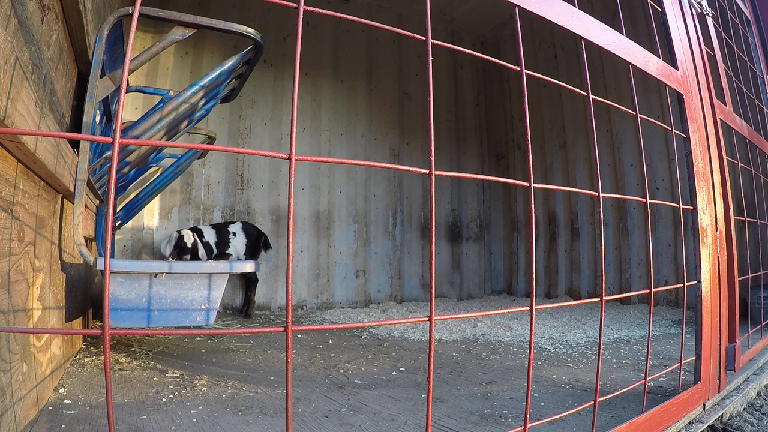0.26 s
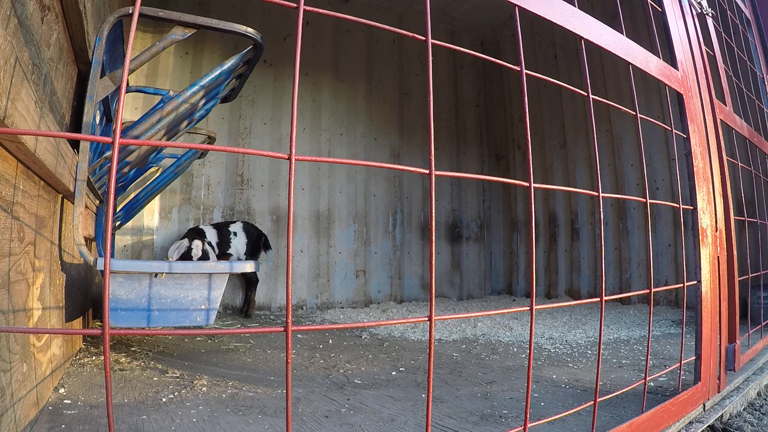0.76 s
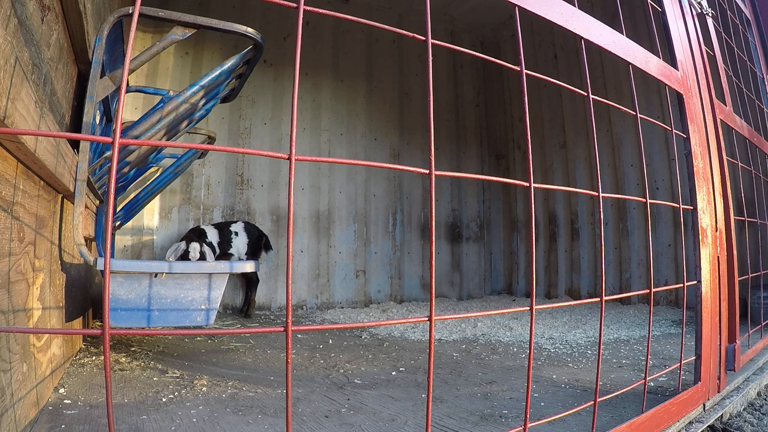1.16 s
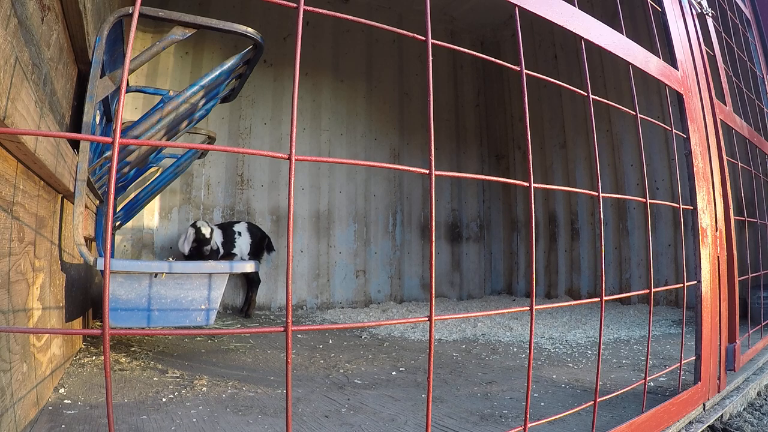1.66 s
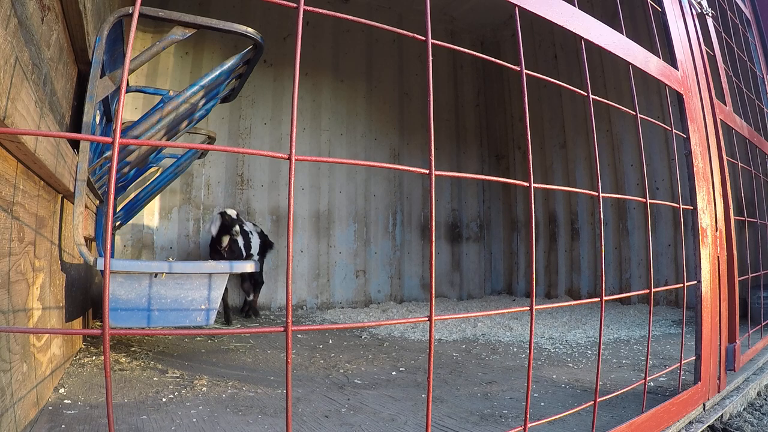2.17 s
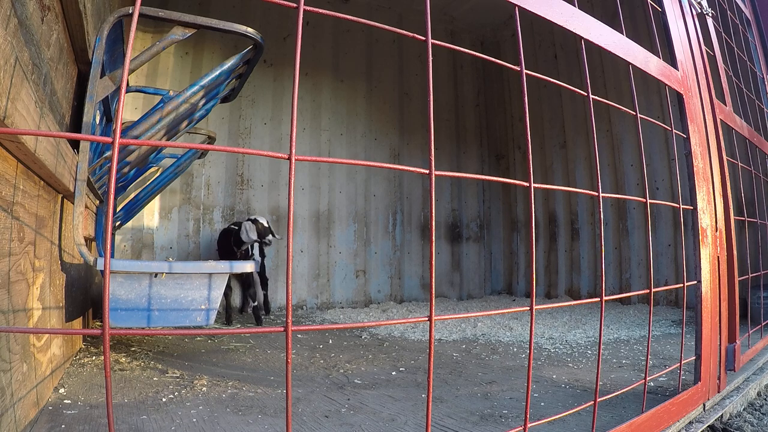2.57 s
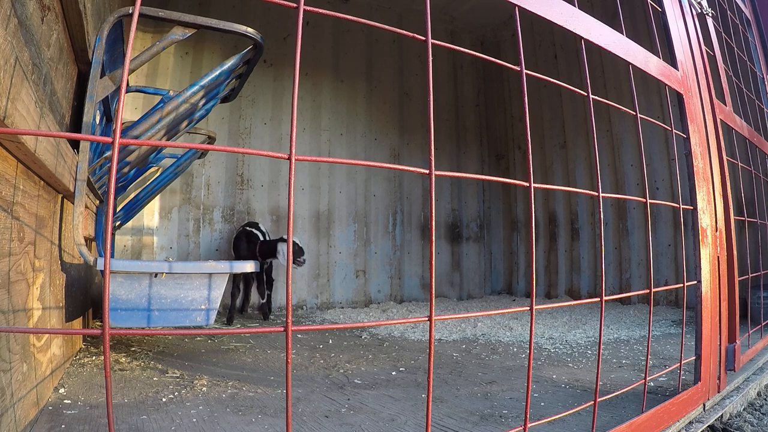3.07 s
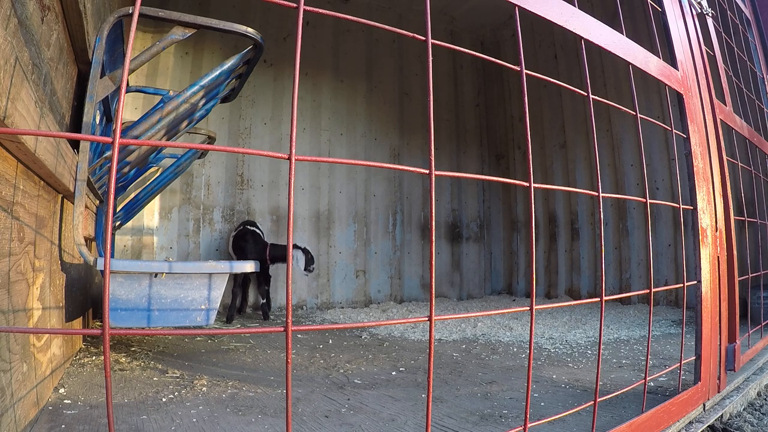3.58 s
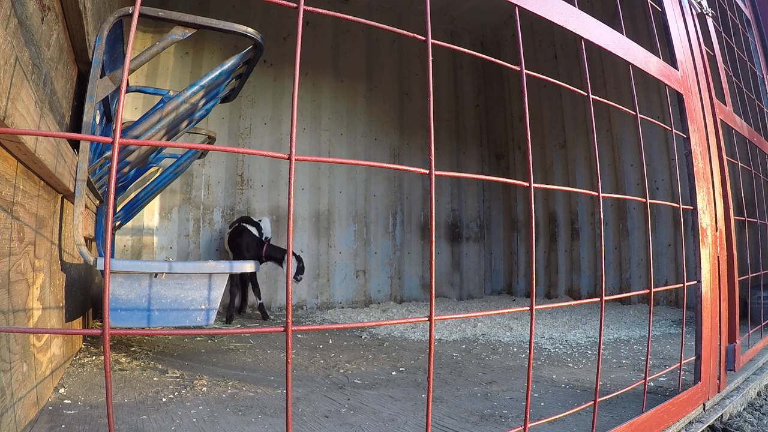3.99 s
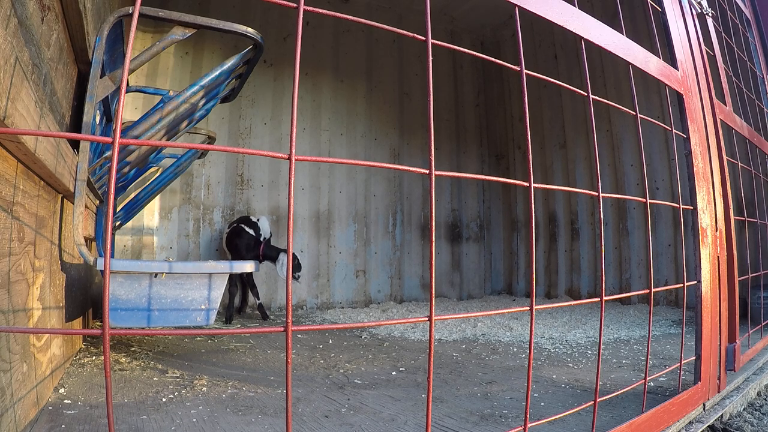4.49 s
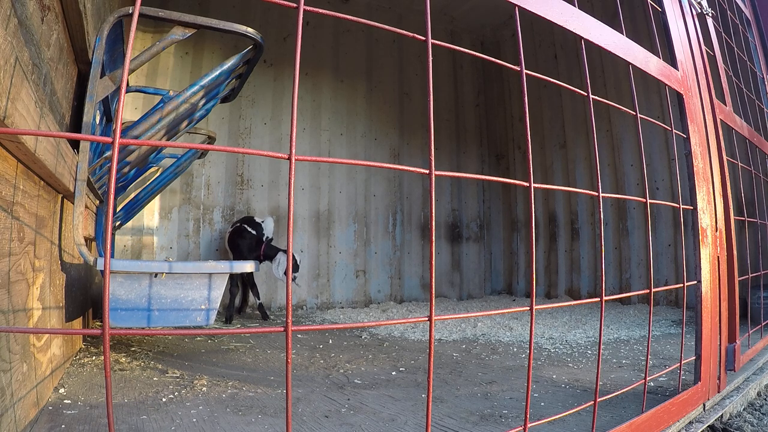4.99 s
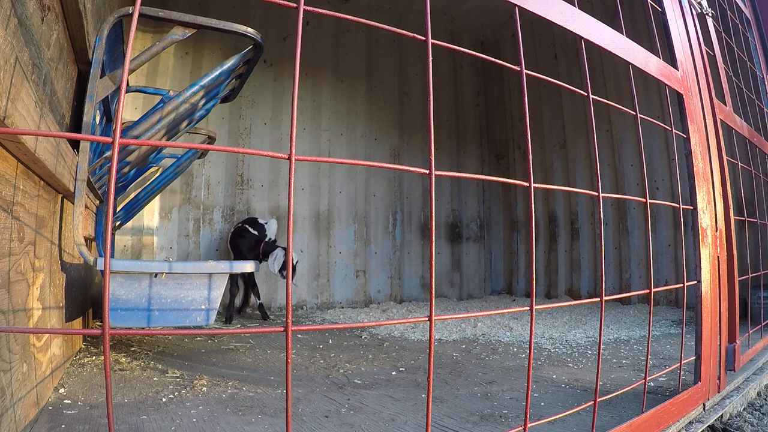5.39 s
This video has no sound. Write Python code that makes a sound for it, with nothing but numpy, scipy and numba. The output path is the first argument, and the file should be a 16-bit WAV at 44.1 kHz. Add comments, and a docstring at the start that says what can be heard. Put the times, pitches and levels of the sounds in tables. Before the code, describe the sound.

A quiet outdoor bed runs throughout: soft hiss, thin high insect sizzle and a wavering low rumble. At about 0.45 s a faint bird peep drops onto its note and fades, joined from 0.5 to 1.35 s by a distant harsh falling call and, near 0.9 s, a very faint arched whistle. From 1.83 s a plastic tub drags low over the floor; at 2.13 s a hoof knocks it with a hollow clack and a deep, shuddering boom, with lighter taps until 2.3 s. A young goat bleats once from 2.47 to 3.35 s: a small closed-mouth start, then bursting loud near 2.7 s, high, nasal and quavering, sinking hoarsely. Metal walls echo it strongly but briefly. Small hoof taps follow around 3.4, 4.1 and 4.8 s. From 4.25 s to the end faint scratchy chirps repeat about five times a second, with another far harsh call and weak whistles.

```python
"""Goat kid in a metal pen

A goat kid bleats once in a sheet-metal pen: throat-weighted vocal-fold overtones plus gated breath noise.
Walls (cross-fed delay lines) return the voice strongly, so each overtone beats with its own echoes.
Hooves knock a plastic tub and the floor (noise bursts, decaying modes); the tub is pushed along (low noise).
Outside: faint birds (swept tones, noise chirps), hissing insects (noise bands), a wavering low rumble."""
import sys
import numpy as np
from scipy import signal
from scipy.fft import rfft, irfft
from scipy.io import wavfile
from scipy.ndimage import uniform_filter1d
from numba import njit

SR = 44100
rng = np.random.default_rng(int(sys.argv[2]) if len(sys.argv) > 2 else 0)


def transcribe(signal):
    """Save signal, clipped to [-1, 1], as a 16-bit WAV file at the path in sys.argv[1]."""
    frames = np.atleast_2d(signal).T
    limited = np.clip(frames, -1, 1)
    pcm = np.round(limited * 32767).astype(np.int16)
    wavfile.write(sys.argv[1], SR, pcm)


N = 249165
T = np.arange(N) / SR


def undb(db):
    """dB to gain."""
    return 10 ** (np.asarray(db) / 20)


def columns(table):
    """Interpolate each column linearly over time; last item gates the table's time span."""
    s, *rest = np.transpose(table)
    return [np.interp(T, s, c) for c in rest] + [(T > s[0]) & (T < s[-1])]


def unit(x):
    """Scale to rms 1."""
    return x / np.sqrt(np.mean(x ** 2))


def band(lo_hz, hi_hz):
    """Noise between two edges, rms 1."""
    sos = signal.butter(2, [lo_hz, hi_hz], "bandpass", fs=SR, output="sos")
    return unit(signal.sosfilt(sos, rng.standard_normal(N)))


def walk(rate_hz):
    """Smoothed random steps, rms 1."""
    k = int(SR / rate_hz)
    steps = np.repeat(rng.standard_normal(N // k + 1), k)
    return unit(uniform_filter1d(uniform_filter1d(steps, k), k)[:N])


def since(start_s, length_s, attack_s=0.014, release_s=.04):
    """Share of an event gone by, and its gate with linear edges."""
    gate = np.clip(np.minimum((T - start_s) / attack_s, (start_s + length_s - T) / release_s), 0, 1)
    return np.clip((T - start_s) / length_s, 0, 1), gate


def tone(hz):
    """Sine that follows a pitch track."""
    return np.sin(2 * np.pi * np.cumsum(hz) / SR)


def peak(hz, centre_hz, width_hz):
    """Gain of a steep resonance: 1 at its centre, a quarter at half its width off."""
    return 1 / (1 + (2 * (hz - centre_hz) / width_hz) ** 2) ** 2


def ring(modes):
    """Impulse response of a struck body: a sum of exponentially decaying sine modes."""
    t = T[:SR // 2]
    return sum(undb(db) * np.sin(2 * np.pi * hz * t) * 1000. ** (-t / t60) for hz, db, t60 in modes)


def goat():
    """Vocal-fold overtones weighted by throat resonances, with breath gated once a cycle."""
    # fold pitch: time_s, pitch_hz
    pitch_track = [(2.47, 315), (2.48, 315.3), (2.55, 507.4), (2.606, 509.7), (2.69, 556), (2.72, 545.7),
                   (2.75, 516.5), (2.782, 537.4), (2.882, 569.8), (2.94, 565.5), (3.03, 550.2),
                   (3.075, 553.3), (3.2, 507.6), (3.255, 488), (3.32, 418), (3.345, 405)]
    # octave, in the first throat resonance, quavering: time_s, level_db
    octave_track = [(2.47, -55), (2.486, -34), (2.534, -40), (2.596, -41), (2.654, -25.5), (2.708, -11),
                    (2.75, -18.5), (2.812, -17.5), (2.844, -11), (2.894, -21), (2.98, -11.5), (3.04, -18),
                    (3.17, -18.5), (3.212, -29.5), (3.3, -30.5), (3.345, -35)]
    # mouth opening and closing: time_s, low_resonance_db, upper_resonance_hz, upper_resonance_db, treble_db
    mouth_track = [(2.47, -62, 3100, -62, -68), (2.53, -51.5, 3200, -48, -60),
                   (2.596, -53.5, 3040, -30.5, -55), (2.654, -38, 3200, -37, -45),
                   (2.715, -29, 3250, -24, -31.5), (2.812, -28, 3270, -23, -35.5),
                   (2.88, -41.5, 3343, -27, -35.5), (2.994, -37, 3760, -24, -37),
                   (3.064, -45, 3800, -24, -39), (3.19, -28.5, 3400, -26.5, -39),
                   (3.27, -28, 3536, -39, -50), (3.345, -53, 3600, -55, -65)]
    # resonances between low and top: centre_hz, width_hz, level_db (re treble)
    high_middle = [(2302, 150, 7.5), (2080, 340, -0.5), (2689, 350, 2)]
    # fixed top resonances of the mouth: centre_hz, width_hz, level_db (re treble)
    mouth_top = [(5500, 1500, -3), (6600, 1200, -8), (7500, 800, -17), (9500, 2500, -41),
                 (11800, 1800, -31.5)]
    taut_hz, slack_hz = 545, 425  # folds turn hoarse as they slacken
    clear_rough, open_s, onset_share = .03, 2.66, .45  # less hoarse before the mouth opens
    jitter, hoarse_jitter = .0004, .03  # pitch spread as a share: always; added at full roughness
    first_db, first_attack_s, first_sag_db_per_s = -34.5, .04, 9.5  # fundamental
    patchy_db = 2.5  # rms of each overtone's own waxing and waning
    half_line_db = -22  # strong and weak pulses alternate a little
    haze_db = -34  # constant air leak past the folds, re octave
    upper_width_hz, release_s = 1220, .025

    hz, on = columns(pitch_track)
    hz = uniform_filter1d(hz, size=800)[on]  # folds change tension smoothly
    t, octave_db = T[on], columns(octave_track)[0][on]
    low_db, upper_hz, upper_db, treble_db = (c[on] for c in columns(mouth_track)[:-1])

    slack = np.clip((taut_hz - hz) / (taut_hz - slack_hz), 0, 1)
    rough = np.minimum(clear_rough + slack ** 1.4 * np.where(t < open_s, onset_share, 1), 1)
    sag_db = first_sag_db_per_s * (t - t[0]) + 12 * (t > open_s) * slack ** 1.3
    first = undb(first_db - sag_db) * np.minimum((t - t[0]) / first_attack_s, 1)
    wobble = jitter * walk(60)[on] + hoarse_jitter * rough * walk(300)[on]
    phase = 2 * np.pi * np.cumsum(hz * (1 + wobble)) / SR

    breath = undb(upper_db) * band(3200, 4400)[on] + undb(treble_db) * band(4800, 7200)[on]
    breath += .6 * rough * undb(octave_db) * band(900, 1300)[on]
    voice = 0.86 * rough * breath * (1 + np.cos(phase))
    voice += undb(octave_db + haze_db) * band(1250, 2100)[on]
    voice += first * undb(.6 * patchy_db * walk(9)[on]) * np.sin(phase)
    voice += undb(octave_db) * np.sin(2 * phase)
    for k in np.arange(5, 56) / 2:  # whole and half multiples of the pitch
        f = k * hz
        gain = undb(upper_db) * peak(f, upper_hz, upper_width_hz)
        gain = gain + undb(low_db) * peak(f, centre_hz=1470, width_hz=800)
        treble = sum(undb(db) * peak(f, centre, width) for centre, width, db in high_middle + mouth_top)
        gain = gain + undb(treble_db) * treble
        line_db = half_line_db * (k % 1 > 0) + patchy_db * walk(14)[on]
        voice += gain * undb(line_db) * np.sin(k * phase + k * k)
    out = np.zeros(N)
    out[on] = voice * np.minimum((t[-1] - t) / release_s, 1)
    return out


@njit
def walls(x, lags, gain, damp):
    """Eight delay lines that feed each other, duller on every round."""
    line, soft, out = np.zeros((8, 4096)), np.zeros(8), np.zeros(len(x))
    for i in range(len(x)):
        total = 0.
        for k in range(8):
            soft[k] += (1 - damp) * (gain[k] * line[k, (i - lags[k]) & 4095] - soft[k])
            total += soft[k]
            out[i] += soft[k] * (1 - 2 * (k % 2))
        for k in range(8):
            line[k, i & 4095] = x[i] + soft[k] - total / 4
    return out


def knocks():
    """A hoof gives a short crack and rings the tub; the floor booms a moment later and shakes on."""
    # hoof blows: start_s, click_db, tub_ring_db, floor_boom_db (drive levels)
    blows = [(1.838, -59, -52.5, -40), (2.133, -29.5, -28.5, -10.5), (2.150, -58, -36.5, -50),
             (2.25, -49, -52.5, -50), (2.295, -42, -49, -38), (2.31, -62, -43, -50),
             (2.62, -45.5, -71, -62), (3.39, -70, -51, -45), (3.452, -70, -65, -32), (3.479, -50, -57, -38),
             (4.039, -56, -56, -50), (4.109, -69, -57.5, -53), (4.79, -60, -62.5, -56)]
    # tub modes: pitch_hz, level_db, t60_s
    tub_modes = [(317.2, 2, 0.12), (401, 2, 0.2), (483, 2, 0.07), (599.7, 1, .025), (786, -8.5, 0.02),
                 (1540, -7, 0.02), (2050, -4, 0.013), (2950, -8, 0.015)]
    # floor modes: pitch_hz, level_db, t60_s
    floor_modes = [(34, 0, .2), (62, -14, .2), (115, -11, .15)]
    boom_lag_s, boom_rise_s = .028, 0.0091
    shudder_db, shudder_decay_s = -27.5, .2  # floor keeps shaking after a boom
    drag_s, drag_length_s, drag_db, drag_fade_db = 1.83, 0.27, -35, 11.5  # tub pushed over the floor

    crack, tub_hit, floor_hit = np.zeros((3, N))
    for s, click_db, ring_db, boom_db in blows:
        crack[int(s * SR)], tub_hit[int(s * SR)] = undb(click_db), undb(ring_db)
        floor_hit[int((s + boom_lag_s) * SR)] = undb(boom_db)

    t = T[:SR // 10]
    blow = band(900, 3300)[:len(t)] * np.exp(-t / 0.0036)
    scuff = 0.2 * band(1500, 6500)[:len(t)] * t / 0.015 * np.exp(-(t / .03) ** 2)  # hoof on the rim
    near = signal.fftconvolve(crack, blow + scuff)[:N] + signal.fftconvolve(tub_hit, ring(tub_modes))[:N]
    near = uniform_filter1d(near, size=5)  # horn on plastic is a soft contact

    shake = signal.fftconvolve(floor_hit, np.exp(-T[:SR] / shudder_decay_s))[:N]
    shudder = undb(shudder_db) * shake * band(18, 60)
    gone, gate = since(drag_s, drag_length_s)
    drag = gate * undb(drag_db - drag_fade_db * gone) * unit(band(26, 87) + 0.046 * band(358, 397))
    floor_ring = ring(floor_modes) * (1 - np.exp(-T[:SR // 2] / boom_rise_s))
    boom = signal.fftconvolve(floor_hit, floor_ring)[:N]
    return near, shudder + drag + boom


def peeps():
    """Near-sine whistles that drop onto their note, then fade."""
    # start_s, length_s, pitch_hz, level_db
    peep_calls = [(.45, .33, 3190, -54.5), (4.27, 0.13, 3105, -67)]
    attack_s, drop_share, fade_db = 0.0314, .05, 20
    out = np.zeros(N)
    for s, length, hz, db in peep_calls:
        gone, gate = since(s, length, attack_s)
        gain = gate * undb(db - fade_db * gone + 3.0 * walk(60.1))
        out += gain * tone(hz * (1 + drop_share * np.exp(-gone * length / attack_s)))
    return out


def arches():
    """Near-sine whistles whose pitch rises and falls."""
    # start_s, length_s, top_hz, level_db
    arch_calls = [(.9, .37, 2000, -70), (4.57, .24, 1995, -75)]
    top_share, depth_share, edge_db = .35, .09, 9
    out = np.zeros(N)
    for s, length, hz, db in arch_calls:
        gone, gate = since(s, length)
        rise, fall = 1 - gone / top_share, 2.1 * (gone - top_share) / (1 - top_share)
        off = np.minimum(np.where(gone < top_share, rise, fall), 1) ** 2
        gain = gate * undb(db - edge_db * np.abs(2 * gone - 1) ** 3 + 2.9 * walk(60))
        out += gain * tone(hz * (1 - depth_share * off))
    return out


def screams():
    """Harsh falling calls: a tone with eight copies whose pitches are shaken fast, ever wider."""
    # start_s, length_s, level_db (of the main tone, before fading)
    scream_calls = [(0.529, 0.827, -58.5), (4.33, .95, -71)]
    from_hz, to_hz, fall_s, fade_db = 4800, 3750, .5, 10
    flick_hz, flick_s = 550, 0.01204  # extra height at the onset
    out = np.zeros(N)
    for s, length, db in scream_calls:
        gone, gate = since(s, length, release_s=0.13)
        hz = to_hz + (from_hz - to_hz) * np.exp(-gone * length / fall_s)
        hz = hz + flick_hz * np.exp(-gone * length / flick_s)
        gain = gate * undb(db - fade_db * gone ** 0.62)
        spread_hz = 79.5 + 380 * gone
        out += gain * tone(hz + 40 * walk(200))
        for _ in range(8):  # echoes off the buildings blur the line
            out += gain * undb(-3.0) * tone(hz + spread_hz * walk(1500))
    return out


def chirps():
    """Scratchy chirps: broad noise bands with a short swell and a decaying tail."""
    # start_s, level_db (of the noise before shaping)
    chirp_calls = [(4.25, -71), (4.459, -60.5), (4.66, -59.5), (4.864, -60.5), (5.075, -62.5),
                   (5.274, -58.5), (5.484, -57)]
    centre_hz = 4800
    out = np.zeros(N)
    for s, db in chirp_calls:
        t = np.maximum(T - s, 0)
        swell = np.exp(-((T - s - .018) / .021) ** 2)
        shape = (swell + .6 * (t > .016) * np.exp(-t / .055)) * undb(3 * walk(200))
        noise = band(0.74 * centre_hz, 1.27 * centre_hz) + 0.07 * band(7000, 13000)
        out += undb(db) * shape * noise
    return out


def air():
    """Outdoor bed: coloured noise hiss, insect noise bands, thin tones and low rumble noise."""
    # hiss spectrum: frequency_hz, relative_level_db
    hiss_colour = np.array([(71, -28.5), (120, -1), (169, -4.5), (515, -13.5), (1110, -17), (2550, -21.5),
                            (4140, -19), (7920, -27.5), (8580, -26.5), (15100, -33)])
    # thin steady tones: pitch_hz, level_db (before a 3.5 dB lift)
    thin_tones = [(8631, -78.5), (8100, -87)]
    # far insect choruses: centre_hz, width_hz, level_db
    insect_bands = [(4146, 496, -71.5), (5930, 520, -78)]
    hiss_db, rumble_db, rumble_swing_db = -62.5, -54, 1.5
    hz = np.fft.rfftfreq(N, 1 / SR)
    colour = undb(np.interp(np.log(hz + 1), np.log(hiss_colour[:, 0]), hiss_colour[:, 1]))
    hiss = unit(irfft(rfft(rng.standard_normal(N)) * colour, N)) * undb(hiss_db + 0.32 * walk(3.3))
    tones = sum(undb(db + 3.5 + 0.53 * walk(20)) * np.sin(2 * np.pi * f * T) for f, db in thin_tones)
    rumble = unit(band(18, 50) + 0.45 * band(52, 110)) * undb(rumble_db + rumble_swing_db * walk(4))
    chorus = sum(undb(db + 2.2 * walk(5.1)) * band(f - w / 2, f + w / 2) for f, w, db in insect_bands)
    return hiss + chorus + tones + rumble


def scene():
    """Voice and knocks inside the pen, a faint long ring near the loudest overtone, the rest outside."""
    # paths between the walls: delay_ms
    wall_ms = [11.3, 14.9, 18.1, 22.7, 26.3, 31.9, 37.1, 43.7]
    pen_t60_s, pen_damp, pen_db, knock_pen_db = 0.39, 0.42, -6.5, -7  # t60 before damping
    yard_t60_s, yard_db = 2.8, -101
    voice, (near, floor_sound) = goat(), knocks()
    lags = (np.array(wall_ms) * SR / 1000).astype(np.int64)
    pen_input = voice + undb(knock_pen_db) * near + 1e-18  # offset avoids denormals
    pen = walls(pen_input, lags, undb(-60 * lags / SR / pen_t60_s), pen_damp)
    tail = band(1070, 1140)[:2 * SR] * 1000. ** (-T[:2 * SR] / yard_t60_s)
    yard = undb(yard_db) * signal.fftconvolve(voice, tail)[:N]
    inside = voice + near + undb(pen_db) * pen + floor_sound
    birds = peeps() + arches() + screams() + chirps()
    return (inside + yard + birds + air())[None]


def record(dry):
    """Steep elliptic low-pass: the treble stops at 15280 Hz."""
    return signal.sosfilt(signal.ellip(12, .2, 60, 15280, fs=SR, output="sos"), dry)


dry = scene()
out = record(dry)
transcribe(out)
```